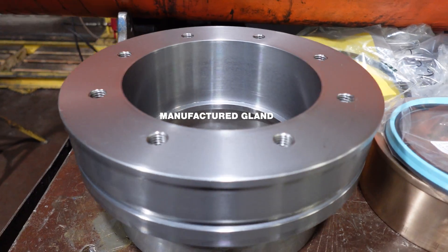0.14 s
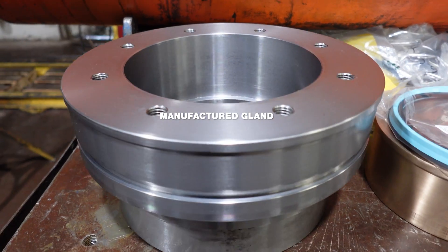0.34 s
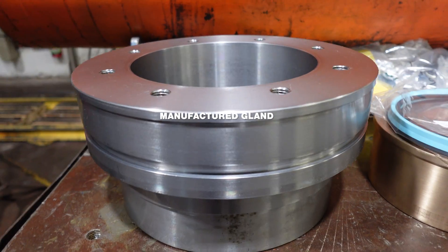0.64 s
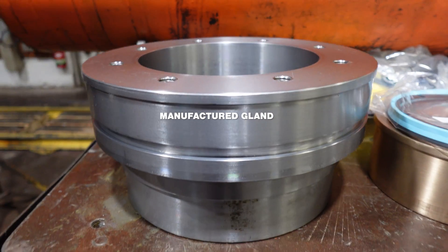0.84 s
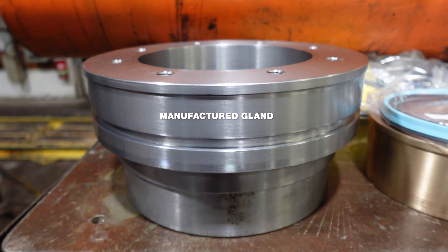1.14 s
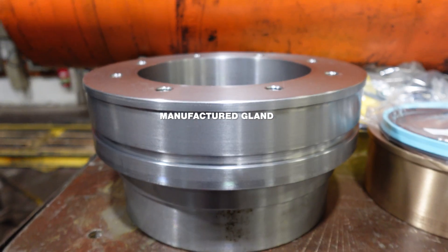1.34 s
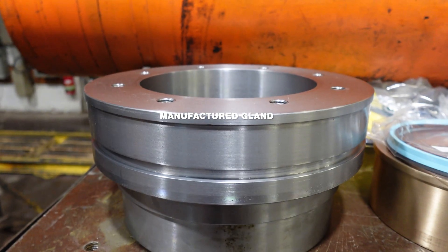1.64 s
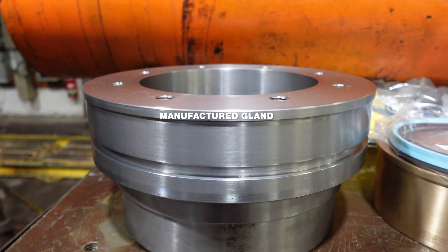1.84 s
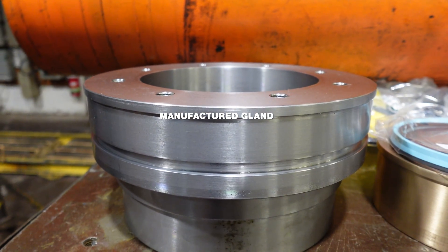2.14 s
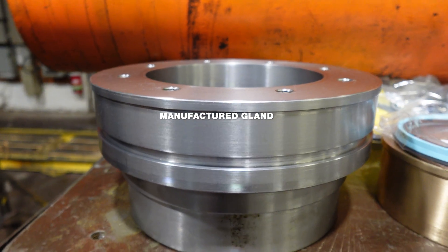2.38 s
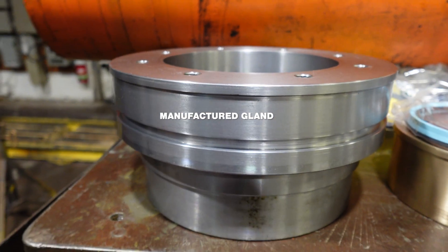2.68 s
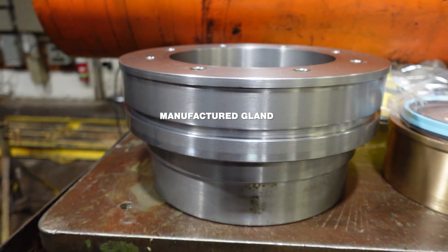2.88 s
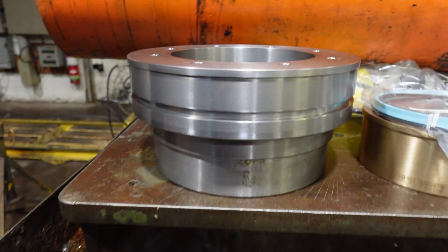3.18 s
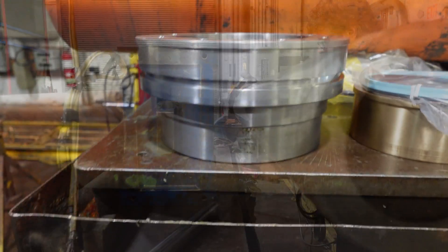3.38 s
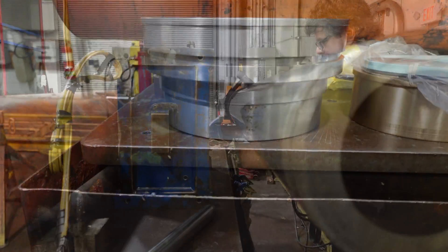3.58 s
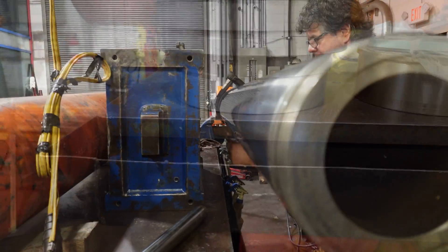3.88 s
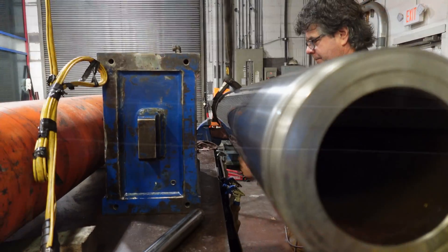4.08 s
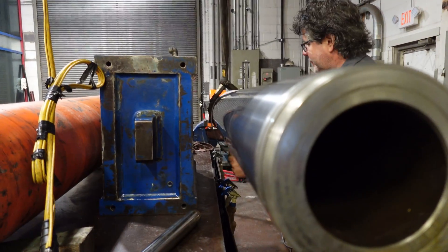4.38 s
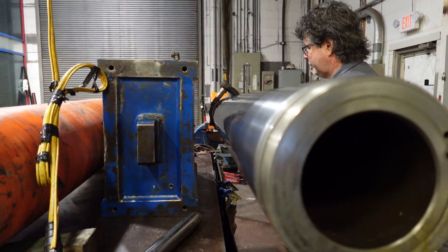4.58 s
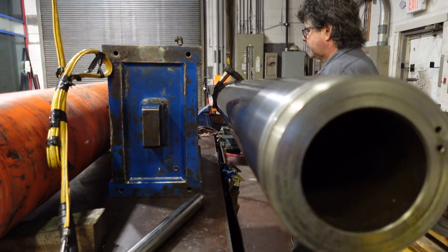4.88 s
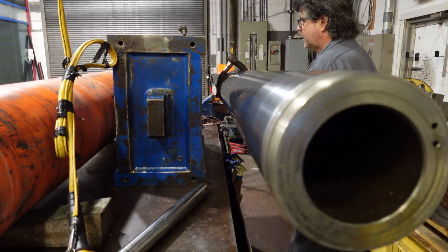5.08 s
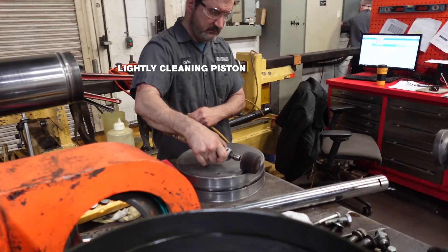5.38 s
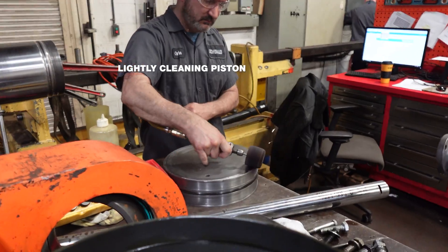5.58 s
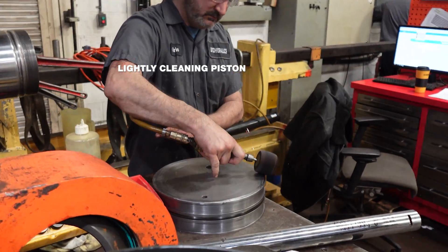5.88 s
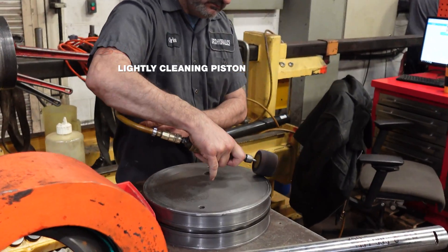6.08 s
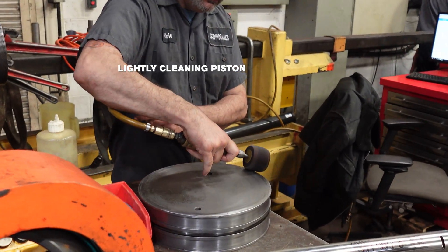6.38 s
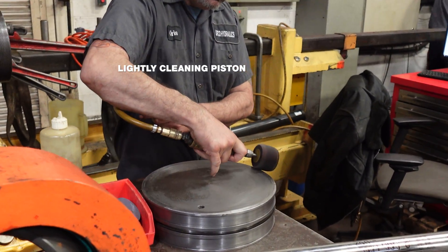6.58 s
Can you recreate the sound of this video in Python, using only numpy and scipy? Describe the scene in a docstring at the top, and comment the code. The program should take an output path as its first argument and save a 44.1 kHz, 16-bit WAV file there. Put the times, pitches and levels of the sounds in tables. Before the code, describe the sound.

An abrasive rubs on ringing steel over machine hum, then a whining air grinder abruptly takes over, cleaning metal in a workshop.

```python
"""Abrasive rubs a steel part, which rings as it is dragged and knocked on a machine shop bench.
A pump throbs and motors hum behind it. That stretch is spliced to play several times over,
then cuts to an air die grinder cleaning a piston: its vanes chop the air into a whine, its exhaust
hisses and its drum rasps once a turn, then it bites into the metal, slows a little and howls."""
import sys
import numpy as np
from scipy import signal
from scipy.fft import rfft, irfft, next_fast_len
from scipy.io import wavfile

SR = 44100
rng = np.random.default_rng(int(sys.argv[2]) if len(sys.argv) > 2 else 0)


def store_pcm(level_fs):
    """Save levels as 16-bit WAV."""
    pcm = np.round(np.clip(level_fs, -1, 1) * 32767).astype(np.int16)
    wavfile.write(sys.argv[1], SR, np.atleast_2d(pcm).T)


N = 296952
T = np.arange(N) / SR
CUT_S = 5.305  # the bench work ends and the grinder begins


def undb(db):
    """Turn decibels into a number to multiply by."""
    return 10 ** (np.asarray(db) / 20)


def unit(x):
    """Scale a signal to an average (rms) size of 1."""
    return x / np.sqrt(np.mean(x ** 2) + 1e-20)


def curves(table):
    """Join each column of a table with straight lines over time."""
    times, *columns = np.transpose(table)
    return [np.interp(T, times, column) for column in columns]


def gain_at(hz, points):
    """Read the gain at these pitches from a (Hz, dB) table."""
    freqs, db = np.transpose(points)
    return undb(np.interp(np.log(hz + 1e-9), np.log(freqs), db))


def colour(x, points):
    """Shape a signal's lows and highs with a (Hz, dB) table; the result has size 1."""
    size = next_fast_len(N)
    gain = gain_at(np.fft.rfftfreq(size, 1 / SR), points)
    return unit(irfft(rfft(x, size) * gain, size)[:N])


def ring(x, hz, width_hz):
    """Make a signal ring at one pitch; a narrower width rings longer."""
    r = np.exp(-np.pi * width_hz / SR)
    feedback = [1, -2 * r * np.cos(2 * np.pi * hz / SR), r * r]
    return signal.lfilter([1, 0, -1], feedback, x) * np.sqrt((1 - r * r) / 2)


def ring_twice(x, hz, width_hz):
    """Two rings in a row pick out the pitch more sharply; the result has size 1."""
    return unit(ring(ring(x, hz, width_hz), hz, width_hz))


def noise():
    """White noise."""
    return rng.standard_normal(N)


def walk(rate):
    """Wander at random by about 1, heading for a new value `rate` times a second."""
    return 1.2 * np.interp(T * rate, np.arange(4096), rng.standard_normal(4096))


def grains(spread_db):
    """A crowd of tiny impacts; spread_db makes their sizes uneven."""
    hits = noise()
    sizes = np.minimum(rng.exponential(size=N // 8 + 1), 6).repeat(8)[:N]
    return unit(hits * undb(spread_db * sizes))


def bursts(table, rise_s=0.00085):
    """The loudness of blows that rise quickly and die away."""
    power = np.zeros(N)
    for start, db, decay_s in table:
        age = T[:N - int(start * SR)]
        blow = undb(db) * (1 - np.exp(-age / rise_s)) * np.exp(-np.minimum(age / decay_s, 20))
        power[int(start * SR):] += blow ** 2
    return np.sqrt(power)


def swell(start, length):
    """A smooth rise and fall: half a sine wave."""
    return np.sin(np.pi * np.clip((T - start) / length, 0, 1))


def pulses(turns, scatter_db):
    """One click of random size at each whole turn."""
    at = np.flatnonzero(np.diff(np.floor(turns)) > 0)
    out = np.zeros(N)
    out[at] = undb(scatter_db * np.clip(rng.standard_normal(4096)[:len(at)], -2, 1))
    return out


def room(x, wet_db, t60_s, dull_hz):
    """Add a duller echo, different left and right, that fades by 60 dB in t60_s."""
    age = T[:SR]
    tails = rng.standard_normal((2, SR)) * undb(-60 * age / t60_s) * (age > .004)
    tails /= np.sqrt(np.sum(tails ** 2, axis=1, keepdims=True))
    dull = signal.sosfilt(signal.butter(2, dull_hz, fs=SR, output="sos"), x)
    return x + undb(wet_db) * signal.fftconvolve(dull[None], tails, axes=1)[:, :N]


def machines():
    """A pump throbs, motors hum and a rush of fans buzzes with the mains power."""
    # the pump housing's falling thrum at each stroke (pitch [Hz], half width [Hz], level [dB], delay [s])
    housing = [(288, 16, -56, 0.01195), (275, 24, -59, 0.02553), (264, 28, -56, .041)]
    # motor and mains tones (pitch [Hz], level [dB])
    hum_tones = [(55.3, -80), (95.7, -66.5), (110.6, -65.5), (165.8, -65.5), (221, -57), (400.4, -56),
                 (455.8, -60.5), (600, -48.5), (720, -58.5), (749.7, -72), (1304, -54), (1838, -55.5)]
    # tone colour of the fans (frequency [Hz], level [dB])
    fan_colour = [(30, -42), (60, -22), (110, -15), (190, -17), (260, -5.5), (340, -8), (400, -3),
                  (490, -5.5), (800, -2), (1270, -2.5), (1870, -3.5), (2770, -6.5), (7830, -20.5),
                  (12500, -25.5), (15000, -26)]
    strokes_per_s = 13.83
    pump = hum = 0
    for hz, half_width, db, delay in housing:
        beats = pulses((T - delay) * strokes_per_s, scatter_db=0.23)
        pump += undb(db) * ring_twice(beats, hz, 2 * half_width)
    for hz, db in hum_tones:
        hum += np.sqrt(2) * undb(db + 0.25 * walk(6.7)) * np.sin(2 * np.pi * hz * T + 0.22 * walk(6.7))
    buzz = 1 + .1 * np.sin(2 * np.pi * 120 * T)
    rush = undb(-38 + 0.65 * walk(14)) * buzz * colour(noise(), fan_colour)
    # the bass is alike on both sides, the treble spreads out
    bass_cut = signal.butter(1, 650, "high", fs=SR, output="sos")
    spread = signal.sosfilt(bass_cut, colour(noise(), fan_colour))
    return pump + hum + rush + undb(-45) * spread * np.array([[1], [-1]])


def distant_whine():
    """Far-off tones waver in pitch and level."""
    # the whine's tones (pitch [Hz], pitch wander [Hz], level [dB])
    tones = [(1185, 15.66, -54.5), (1328, 15.9, -56.5), (1425, 26, -57), (1501, 26, -56)]
    out = np.zeros(N)
    for centre_hz, wander_hz, db in tones:
        size = np.sqrt(2) * undb(db + 3 * walk(11))
        hz = centre_hz + wander_hz * walk(14) + 8 * walk(120)
        out += size * np.sin(2 * np.pi * np.cumsum(hz) / SR)
    return out


def rubbing():
    """Abrasive on steel: fine grains hiss with each stroke, coarse ones rasp, skids squeak."""
    # rubbing strokes (start [s], length [s], fine hiss [dB], coarse rasp [dB], release [s])
    strokes = [(3.195, 0.23, -39, -39, 0.022), (3.439, 0.161, -37.5, -42, .014),
               (3.596, 0.16, -36, -41, 0.01), (3.763, 0.1625, -36.5, -43.5, 0.0081),
               (3.935, 0.13, -34.5, -44.5, 0.033), (4.1, 0.18, -35, -44.5, 0.016),
               (4.289, 0.028, -36, -46, 0.1), (4.37, 0.1, -61, -42, 0.084), (4.62, 0.049, -42, -53, 0.025),
               (4.66, 0.25, -48.5, -41, 0.1), (4.965, 0.287, -51, -41, 0.035)]
    # tone colour of the fine grains (frequency [Hz], level [dB])
    hiss_colour = [(2000, -43), (4000, 1), (6000, 0.5), (8500, -0.5), (11000, -0.5), (13000, -0.5),
                   (16000, 1.5)]
    # tone colour of the coarse grains (frequency [Hz], level [dB])
    grit_colour = [(600, -32), (1400, 3), (2500, 12), (3500, 9), (5000, 3), (7000, -1.5), (10000, -13),
                   (16000, -27)]
    # the abrasive catches and skids (start [s], length [s], pitch [Hz], width [Hz], level [dB])
    skid_events = [(3.21, 0.073, 12300, 6000, -37.5), (3.561, 0.043, 6860, 3500, -35.5),
                   (3.699, 0.081, 9200, 4000, -36.5), (3.88, 0.048, 6260, 3000, -33.5),
                   (3.92, 0.066, 6150, 2000, -36.5), (4.204, 0.074, 5400, 600, -38.5),
                   (4.698, 0.14, 3630, 1200, -42)]
    # the abrasive is slapped onto the steel (time [s], level [dB], decay [s])
    scuff_events = [(3.619, -27, 0.02), (3.933, -26, 0.013), (4.675, -28.5, 0.0034), (4.714, -31.5, 0.0081)]
    # tone colour of those scuffs (frequency [Hz], level [dB])
    scuff_colour = [(300, -36), (1000, -6), (2800, 9), (4000, 6), (6000, 3), (8000, 1), (12000, -18),
                    (16000, -30)]
    grip_s = 0.012
    fine, coarse = np.zeros(N), np.zeros(N)
    for start, length, hiss_db, grit_db, release_s in strokes:
        age = np.maximum(T - start, 0)
        # each stroke grips, holds and lets go
        shape = (1 - np.exp(-age / grip_s)) * np.exp(-np.clip((age - length) / release_s, 0, 20))
        fine = np.hypot(fine, undb(hiss_db) * shape)
        coarse = np.hypot(coarse, undb(grit_db) * shape)
    catch = undb(0.76 * walk(70))
    hiss = fine * colour(grains(spread_db=1.5), hiss_colour)
    grit = coarse * colour(grains(spread_db=1), grit_colour)
    skids = sum(undb(db) * swell(start, length) * unit(ring(grains(spread_db=-3), hz, width))
                for start, length, hz, width, db in skid_events)
    scuffs = colour(grains(spread_db=0.5), scuff_colour) * bursts(scuff_events)
    return catch * (hiss + grit) + skids + scuffs


def squeals():
    """Friction makes short, faint tones that slide in pitch."""
    # squeals (start [s], length [s], first pitch [Hz], last pitch [Hz], level [dB])
    glides = [(3.995, .095, 1155, 1190, -43.5), (4.15, .125, 1165, 1212, -46), (4.18, .11, 1325, 1305, -48),
              (4.19, .14, 1420, 1445, -49), (4.28, .13, 1300, 1300, -49), (4.55, .135, 1285, 1348, -46),
              (4.73, .125, 1178, 1186, -45.5)]
    out = np.zeros(N)
    for start, length, first_hz, last_hz, db in glides:
        hz = np.interp(T, [start, start + length], [first_hz, last_hz]) + 6 * walk(120)
        out += np.sqrt(2) * undb(db) * swell(start, length) * np.sin(2 * np.pi * np.cumsum(hz) / SR)
    return out


def steel_part():
    """The part judders over the bench and each bump sets it ringing; hard knocks add a rough crack."""
    # the part's own notes; close pairs beat, low ones sound late
    # (pitch [Hz], time to fade 60 dB [s], level [dB], delay [s])
    notes = [(389, .3, -6, .015), (1530, .5, .5, .065), (1562, .45, -2.5, .065), (1841, 1.6, -13, .03),
             (1954, .4, -2, .01), (2439, .22, -.5, .01), (2580, .17, -.5, .01), (2760, .22, -1, .01),
             (3133, .4, -3, .01), (3319, 1.45, -4.8, .01), (3348, 1.45, -5.5, .01), (4345, .55, -2.5, 0),
             (4378, .5, .5, 0), (4807, .5, -9, 0), (5114, .4, .5, 0), (6480, .2, -10, 0),
             (6705, .22, .5, .003), (6735, .28, -2.5, .003), (7014, .3, -4.5, 0), (7477, .32, -2, 0),
             (8520, .35, -7, .005), (9420, .28, -7.5, .01), (10170, .25, -7.5, .012),
             (10420, .3, -5.5, .015), (10530, .3, -6, .015), (12240, .16, -9, .01), (12750, .22, -6, .012)]
    # bumps on the bench (time [s], level [dB], treble lost [dB per octave])
    judders = [(3.207, -43, 1), (3.237, -40, -.5), (3.262, -44, 0), (3.293, -44, .5), (3.32, -48, 1.5),
               (3.35, -50, 3), (3.39, -55, 4), (3.491, -54, 2), (3.62, -51, 2)]
    # the hardest knocks (time [s], level [dB], decay [s])
    knocks = [(3.218, -41, 0.025), (3.238, -30, 0.029), (3.29, -30.5, 0.015)]
    # tone colour of a knock (frequency [Hz], level [dB])
    knock_colour = [(300, -39), (1000, -4), (2800, 14), (3700, 6), (4800, 9), (5900, -4), (7000, -7),
                    (8200, -21), (12000, -17), (16000, -30)]
    out, age = np.zeros(N), T[:SR]
    for hz, t60_s, db, delay_s in notes:
        power = np.zeros(N)
        decay = undb(-60 * age / t60_s) * (1 - np.exp(-age / .004))
        for time, bump_db, softness_db in judders:
            start = int((time + delay_s) * SR)
            size = undb(bump_db + db - softness_db * np.log2(hz / 4000))
            power[start:start + SR] += (size * decay) ** 2
        # the loose, shifting contact bends each note, the high ones most, and makes it flutter
        cycles = np.cumsum(hz * (1 + .003 * min(hz / 5500, 1) * walk(180))) / SR
        flutter = .95 + .33 * walk(80)
        tone = np.sqrt(2) * flutter * np.sin(2 * np.pi * (cycles + rng.random()))
        # scraping keeps nudging the note at random and roughens it
        scrape = ring(noise(), hz, width_hz=110 * np.sqrt(hz / 4000))
        out += np.sqrt(power) * (tone + undb(-10) * scrape)
    return out + colour(grains(spread_db=0), knock_colour) * bursts(knocks)


def drum_rasp(turns):
    """Once a turn the drum slaps the metal, which rings for a millisecond or two at a varying pitch."""
    # the ring moves with the drum's place on the piston (time [s], pitch [Hz])
    ring_pitch = [(5.31, 3386), (5.4, 3723), (5.65, 3734), (5.85, 3840), (6.05, 3560), (6.7, 3560)]
    # the narrow band the slaps ring in (frequency [Hz], level [dB])
    slap_colour = [(2600, -18), (3000, -1.5), (3500, -1), (4020, 1.5), (4300, -9), (5000, -18)]
    slap_decay_s, spread_hz = .00036, 240
    slaps = pulses(turns + .06 * walk(240), scatter_db=2.4)
    age = T[:SR // 200] / slap_decay_s
    loudness = np.convolve(slaps, age ** 2 * np.exp(-age))[:N]
    hz = curves(ring_pitch)[0] + spread_hz * walk(450)
    high_ring = colour(loudness * np.sin(2 * np.pi * np.cumsum(hz) / SR), slap_colour)
    low_ring = ring_twice(slaps, hz=2020, width_hz=460)
    return high_ring + undb(-12) * low_ring


def vane_whine(hz, turns, load_db):
    """Vanes chop the air into tones at whole multiples (orders) of the spin rate."""
    # the main tones (time [s], vane tone [dB], whistle [dB], overtones [dB])
    tone_levels = [(5.31, -45, -53, -54), (5.42, -42.5, -52, -47), (5.56, -44, -46, -53),
                   (5.66, -44.5, -50, -46), (5.88, -44, -50, -51), (5.98, -39, -44, -47),
                   (6.13, -38.5, -42, -44.5), (6.19, -42.5, -50, -48), (6.26, -43, -36.5, -50),
                   (6.5, -49, -37.5, -42), (6.58, -52, -42, -43), (6.66, -49, -43, -41),
                   (6.72, -53, -43, -43)]
    # the tone one order above the vanes (time [s], level [dB])
    side_levels = [(5.31, -51), (5.53, -55), (5.59, -47), (5.76, -47), (5.82, -53), (6.15, -47), (6.3, -54),
                   (6.72, -52)]
    # overtones that stand out as the drum bites (order [cycles per turn], level offset [dB])
    overtones = [(8, -1), (9, -3), (10, -4), (12, -1.5), (16, 2)]
    # tone colour of all the other orders (frequency [Hz], level [dB])
    whine_colour = [(120, -63), (235, -26.5), (470, -21), (720, -19), (1350, -12), (1650, 0.5), (2050, 5),
                    (2300, 1), (2550, -3), (3000, -9), (3300, 2), (3900, -7), (4300, -18), (5500, -12),
                    (8300, -32), (15000, -24)]
    vanes, side_order, whistle_order = 4, 5, 20
    angle = 2 * np.pi * turns
    vane_db, whistle_db, overtone_db = curves(tone_levels)
    side_db = curves(side_levels)[0]
    out = undb(vane_db + 1.5 * walk(25)) * np.sin(vanes * angle)
    out += undb(side_db + 1.6 * walk(14)) * np.sin(side_order * angle)
    out += undb(whistle_db + 0.98 * walk(22)) * np.sin(whistle_order * angle + 0.35 * walk(60))
    for order, db in overtones:
        out += undb(overtone_db + db + 2 * walk(22)) * np.sin(order * angle + .4 * walk(60))
    for order in np.setdiff1d(np.arange(1, 41), (vanes, side_order, whistle_order, *dict(overtones))):
        flutter_db = 2.8 * walk(18)
        # harder grinding feeds the higher orders and drains the lowest
        growth_db = (.95 if order > 3 else -.7) * load_db
        size = undb(-52 + growth_db + flutter_db) * gain_at(order * hz, whine_colour)
        out += size * np.sin(order * angle + rng.uniform(0, 2 * np.pi) + 0.5 * walk(40))
    return np.sqrt(2) * out


def drum_howl(turns):
    """The drum labours: rough grinding, strongest once a turn, swells around one pitch."""
    start_s, rise_s = 6.51, .18
    rub = noise() * (1 + .6 * np.sin(2 * np.pi * turns))
    fade_in = np.clip((T - start_s) / rise_s, 0, 1)
    return undb(-39) * fade_in * ring_twice(rub, hz=2100, width_hz=370)


def grinder():
    """The drum slaps the piston, then settles into even grinding under the exhaust hiss."""
    # how fast the drum spins (time [s], speed [turns per second])
    speed = [(5.31, 221), (5.38, 235.7), (5.5, 241.7), (5.68, 233.8), (5.83, 238), (6.04, 240.4),
             (6.12, 238.7), (6.25, 230), (6.5, 230.2), (6.56, 227), (6.68, 224)]
    # the grinder's noises (time [s], rasp [dB], grinding [dB], exhaust air [dB])
    noise_levels = [(5.31, -35.5, -43, -32.5), (5.6, -34.5, -43, -36), (5.7, -35, -42, -34.5),
                    (5.88, -36.5, -41.5, -33), (6.05, -39, -35, -36.5), (6.25, -56, -34, -36),
                    (6.45, -54, -33.5, -36.5), (6.72, -49, -34.5, -36)]
    # tone colour of the grinding (frequency [Hz], level [dB])
    grinding_colour = [(60, -58), (118, -36), (190, -54), (300, -47), (1000, -17), (1450, -9.5), (1750, 1),
                       (2200, -2.5), (2500, -4.5), (3600, -6), (5000, -4.5), (9000, -10.5), (16000, -16.5)]
    # tone colour of the exhaust air (frequency [Hz], level [dB])
    air_colour = [(40, -61), (120, -42), (170, -39), (290, -32), (420, -21.5), (620, -12), (1000, -5.5),
                  (1400, -3), (2000, -1), (2550, -6), (3100, 5.5), (3800, 8.5), (4400, 1.5), (5100, -3.5),
                  (5600, -0.5), (6400, -1), (7200, -2.5), (8000, -3), (8700, -8.5), (9700, -7.5),
                  (11500, -6), (13000, -12), (16000, -10.5)]
    hz = curves(speed)[0]
    turns = np.cumsum(hz) / SR
    rasp_db, grinding_db, air_db = curves(noise_levels)
    rasp = undb(rasp_db) * drum_rasp(turns)
    grinding = undb(grinding_db + 1.85 * walk(45)) * colour(grains(spread_db=2.2), grinding_colour)
    air = undb(air_db + .5 * walk(25)) * colour(noise(), air_colour)
    whine = vane_whine(hz, turns, load_db=grinding_db - grinding_db[T > CUT_S].mean())
    noises = room(rasp + grinding + drum_howl(turns) + air, wet_db=-11, t60_s=0.084, dull_hz=11400)
    return noises + room(whine, wet_db=-28, t60_s=0.48, dull_hz=9000)


def scene():
    """The repeating bench work, then a hard cut to the grinder."""
    # splices that replay the bench work (start [s], end [s], copied from [s])
    splices = [(0, 1.037, 3.904), (1.037, 2.772, 3.206), (2.772, 3.206, 4.507)]
    bench = machines() + distant_whine()
    bench = bench + room(rubbing() + steel_part() + squeals(), wet_db=-5.5, t60_s=0.2, dull_hz=9900)
    # the stretch that is copied opens with a brief fade
    bench *= np.where(T < 3.206, 1, np.clip((T - 3.204) / .014, 0, 1))
    for start, end, source in (np.array(splices) * SR).astype(int):
        bench[:, start:end] = bench[:, source:source + end - start]
    switch = np.clip((T - CUT_S) / .004, 0, 1)
    return (1 - switch) * bench + switch * grinder()


def record(dry):
    """The right side is a touch louder; the highest treble is cut steeply."""
    balanced = dry * undb(np.array([[-.25], [.25]]))
    return signal.sosfilt(signal.ellip(12, .1, 80, 15800, fs=SR, output="sos"), balanced)


dry = scene()
out = record(dry)
store_pcm(out)
```